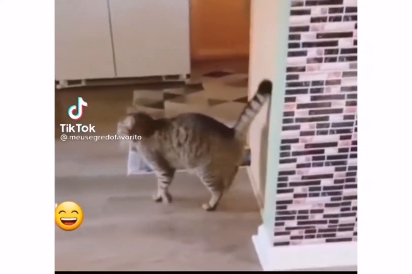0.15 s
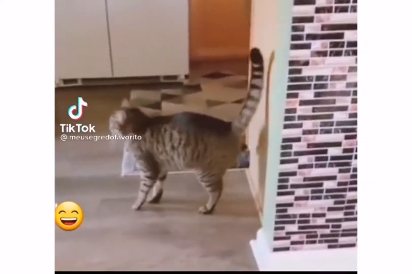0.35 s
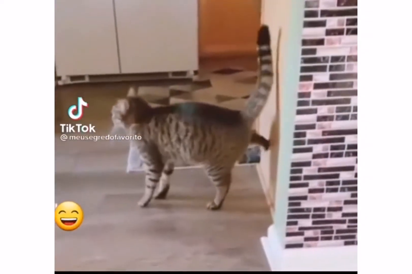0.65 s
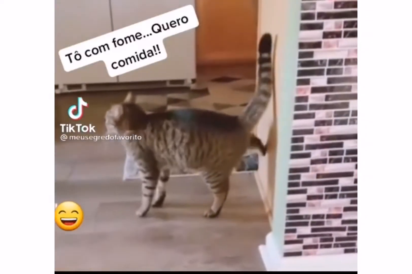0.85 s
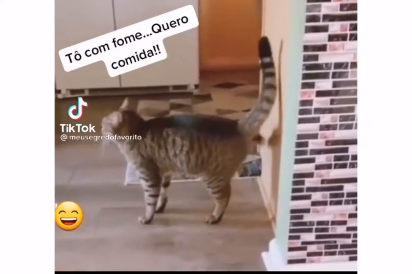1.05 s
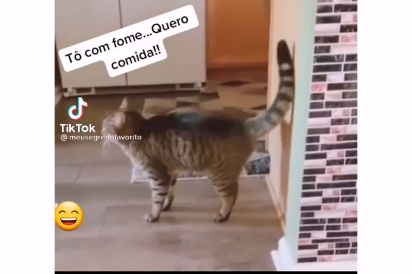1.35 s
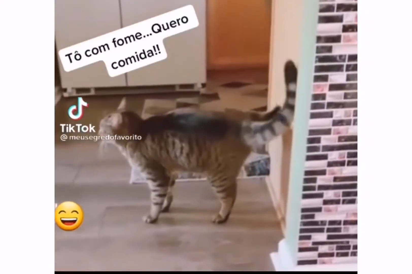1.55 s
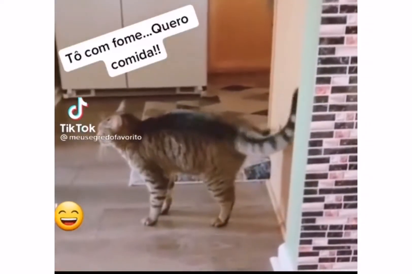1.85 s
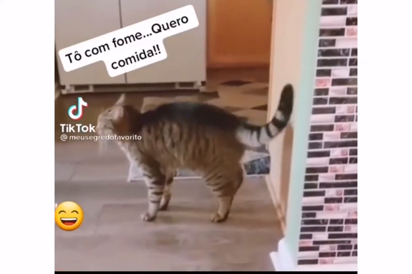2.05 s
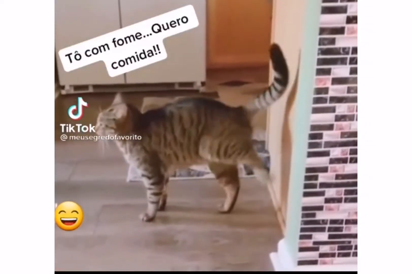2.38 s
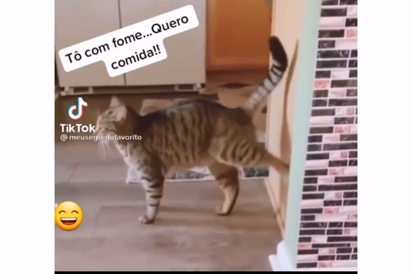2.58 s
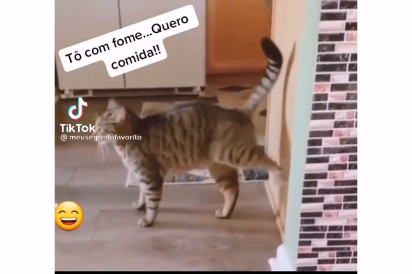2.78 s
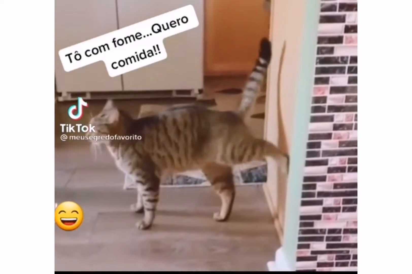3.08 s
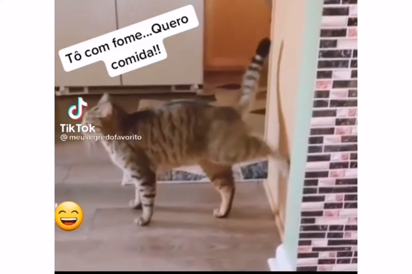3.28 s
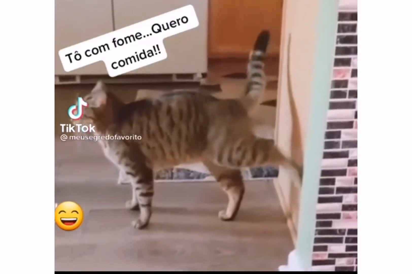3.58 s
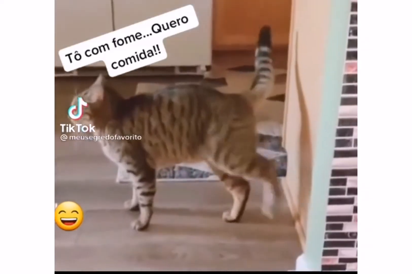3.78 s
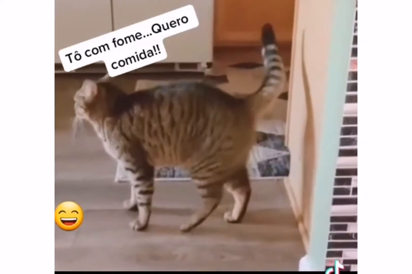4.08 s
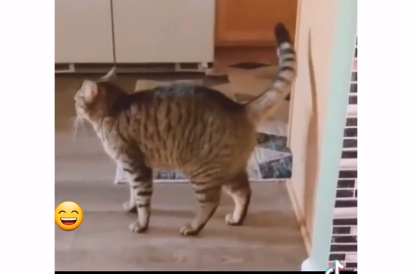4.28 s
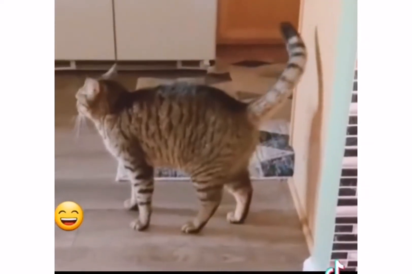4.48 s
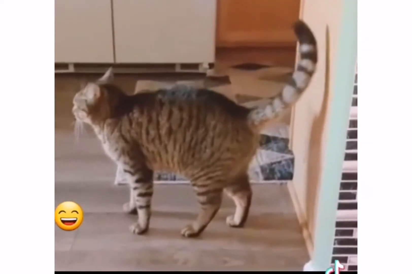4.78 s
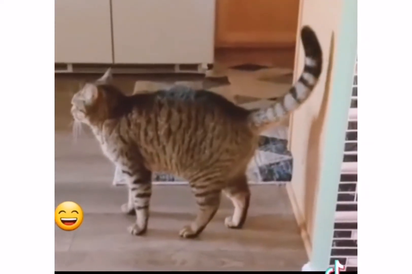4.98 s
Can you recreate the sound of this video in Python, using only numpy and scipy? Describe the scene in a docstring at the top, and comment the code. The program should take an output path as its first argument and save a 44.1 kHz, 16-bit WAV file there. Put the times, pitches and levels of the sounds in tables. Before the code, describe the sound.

Fast, hollow thumping builds as a cat drums its back paw against a wooden panel, claws ticking and skidding on each hit. It breaks off for about half a second, with a faint brush of fur, then a second run rises and fades. Soft steps and light paw taps come last. Underneath are a quiet kitchen appliance hum, a thin whine, low room rumble and slight microphone hiss.

```python
"""A kitchen: a cat drums a hind paw on a hollow wooden panel, in two fast bouts that swell and fade.
In each kick the claws tick and skid, the toes knock, then the pad lands and the panel's modes boom;
the wall sways and the room answers. Fur brushes the wall in the pause. Light taps and soft footfalls
follow. An appliance hums throughout, with a thin whine, room rumble and faint hiss."""
import sys
import numpy as np
from scipy import signal
from scipy.fft import rfft, irfft, next_fast_len
from scipy.io import wavfile

SR = 44100
rng = np.random.default_rng(int(sys.argv[2]) if len(sys.argv) > 2 else 0)


def unload_wav(signal):
    """Save mono or channel-first audio to the path in sys.argv[1] as 16-bit WAV at rate SR, clipped to [-1, 1]."""
    wavfile.write(
        sys.argv[1],
        SR,
        np.round(np.clip(np.atleast_2d(signal).T, -1, 1) * 32767).astype(np.int16),
    )


N = 226669
TIME_S = np.arange(N) / SR

# Spectra of room rumble and microphone hiss. Each row: frequency in Hz, relative level in dB.
RUMBLE_SPECTRUM = [(20, -3), (35, 6), (52, -6), (68, 13.5), (88, -11), (120, 0), (150, -7.5), (377, -8),
                   (574, -14.5), (1030, -19.5), (3160, -30.5), (11800, -41), (16000, -65)]
HISS_SPECTRUM = [(1500, 3.5), (3000, -2), (5500, -4), (8000, -2.5), (10000, -9), (12300, 0), (12900, -14),
                 (13500, -18), (15000, -63)]
# Appliance hum lines. Each row: frequency in Hz, rms level in dB.
HUM_LINES = [(59.2, -61), (118.4, -56), (1523, -73.5), (5566, -79.5)]
# Hiss and whine envelopes. Each row: time in seconds, rms level in dB.
HISS_LEVEL = [(0, -54), (.3, -58.5), (.6, -59.5), (2.2, -62.5), (5.1, -62)]
WHINE_HZ, WHINE_LEVEL = 459.5, [(0, -65), (2.2, -57), (4.2, -57.5)]

# Kicks. Each row: pad landing in seconds, force in dB.
KICKS = [(0.372, -38.5), (0.4523, -25.5), (0.5357, -20), (0.6203, -19), (0.7068, -16.5), (0.7979, -15.5),
         (0.8782, -16.5), (0.9688, -14), (1.0629, -12), (1.1568, -11.5), (1.2609, -8.5), (1.3687, -8),
         (1.47, -8), (1.5839, -8), (1.7121, -11), (1.8428, -12), (2.4266, -37), (2.488, -27),
         (2.558, -21.5), (2.6285, -16.5), (2.7104, -14), (2.789, -12.5), (2.8717, -11), (2.9555, -10.5),
         (3.0423, -10), (3.1286, -11), (3.2192, -10), (3.316, -13), (3.4109, -13.5), (3.5085, -12),
         (3.6202, -14), (3.815, -25)]
USUAL_FORCE_DB = -12
SPOT_SHIFTS_S = [1.2, 2.2]   # paw moves from panel spot 0 to 1, then to 2
# Spectra of claw tick, claw scratch and toe knock. Each row: frequency in Hz, relative level in dB.
TICK_SPECTRUM = [(3000, 2), (4500, 1.5), (6000, 3), (7800, 3), (9400, -6), (11500, 2), (13000, -8.5),
                 (15500, -26)]
SCRATCH_SPECTRUM = [(900, 4.5), (1500, 6), (1900, 2.5), (2300, 1.5), (2850, -0.5), (3600, -1), (4600, -11),
                    (7000, -25)]
KNOCK_SPECTRUM = [(200, -17.5), (320, 8.5), (500, 0), (720, 1.5), (1050, -4), (1500, -10.5), (2000, -14.5),
                  (3500, -63)]
# How sharply the claw tips catch. Each row: time in seconds, extra tick in dB.
CLAW_CATCH = [(.53, 9.5), (.65, 3.5), (.8, 3.5), (1.1, 0.5), (1.6, -5), (1.84, 1), (2.68, -0.5),
              (2.82, 6.5), (2.96, -3), (3.12, 1.5), (3.7, -1.5)]
# How far the claws are out. Each row: time in seconds, extra scratch in dB.
CLAW_REACH = [(.45, -1), (.65, -4.5), (.88, 1.5), (0.969, 5), (1.16, 6), (1.26, 0), (1.84, -0.5),
              (2.63, -2.5), (2.8, 3.5), (2.962, 0), (3.55, -3), (3.818, 8.5)]
# Scratch resonance, sinking late in each bout. Each row: time in seconds, frequency in Hz.
SCRATCH_PITCH = [(.5, 3380), (1.0, 2440), (1.302, 2800), (1.71, 2810), (1.84, 2010), (2.8, 2840),
                 (3.05, 2620), (3.22, 1470), (3.62, 1490)]
# How stiffly the toes land. Each row: time in seconds, extra knock in dB.
TOE_STIFFNESS = [(0.448, 3), (0.798, 2), (1.15, -3.5), (1.84, -6), (2.478, 1), (2.6, 4), (2.87, 3),
                 (3.0, -4), (3.449, -1), (3.62, -6.5), (3.822, 1.5)]
# Panel modes. Each row: frequency in Hz, T60 in seconds, relative level in dB at spots 0, 1 and 2.
PANEL_MODES = [(36, 0.11, -6, -19, -30), (59.6, 0.48, -17, -21.5, -14.5), (83.5, 0.15, -5.5, -4, -12),
               (114.7, 0.26, -3.5, -4, -3), (127.4, 0.14, 7.5, 7, -16), (129.8, 0.12, 10.5, 11, 2),
               (168.3, 0.27, -9, -12.5, -7), (197.36, 0.11, -38, -26, 11), (201, 0.105, 1.6, -41, 12),
               (229.4, 0.202, 5, 7.5, 1.4), (230.2, 0.1447, 8.5, 11.5, 4), (278.2, 0.18, -12, -24, -13.5),
               (334.4, 0.43, -22.5, -37, -22.5), (429.4, 0.2, -20, -20, -46),
               (448, 0.045, -11.5, -13, -6.5), (545.7, 0.18, -25, -13, -26), (590, 0.056, -21, -13, -13)]
# Early reflections of the boom. Each row: delay in seconds, linear gain.
REFLECTIONS = [(.00565, 0.14), (0.0173, 0.15), (0.023, 0.38), (.0331, .42), (0.049, 0.076)]
# Room decay. Each row: frequency in Hz, T60 in seconds.
ROOM_T60 = [(60, 1), (160, 0.69), (420, 0.79), (1100, 0.28), (2900, 0.2), (7700, 0.099), (14000, 0.024)]

# Paw taps. Each row: start in seconds, relative click in dB, length in seconds, relative ring in dB.
TAPS = [(4.033, -51, 0.0093, -59.5), (4.049, -50.5, 0.0052, -53), (4.281, -55.5, 0.0027, -60),
        (4.366, -50.5, 0.049, -50.5), (4.459, -37.5, 0.011, -45), (4.482, -63, 0.0041, -46)]
# Tap click spectrum. Each row: frequency in Hz, relative level in dB.
TAP_SPECTRUM = [(200, -35), (700, 12.5), (1200, -0.5), (2200, -1), (3900, 0.5), (5000, -15), (12000, -20),
                (15500, -24)]
# Modes rung by a tap. Each row: frequency in Hz, relative level in dB, T60 in seconds.
TAP_MODES = [(279, -3, .11), (443, -28, .08), (664, -4, 0.077), (793, -8.5, 0.11), (1425, -14, 0.094),
             (1564, -2, 0.11), (2030, -9, 0.09), (2150, -8, 0.067)]
# Weight settling on the floor. Each row: time in seconds, force in dB.
FOOTFALLS = [(4.087, -45), (4.142, -34), (4.335, -45), (4.375, -34.5)]


def from_db(db):
    """Decibels to gain."""
    return 10 ** (np.asarray(db) / 20)


def unit_rms(x):
    """Scale to rms 1."""
    return x / np.sqrt(np.mean(x ** 2) + 1e-20)


def at_time(table, time_s):
    """Read a table on a time axis."""
    return np.interp(time_s, *np.transpose(table))


def at_hz(table, hz):
    """Read a table on a log-frequency axis."""
    table = np.array(table)
    return np.interp(np.log(np.maximum(hz, 1)), np.log(table[:, 0]), table[:, 1])


def decay(time_s, t60_s):
    """Envelope falling 60 dB in t60_s."""
    return np.exp(-np.log(1000) * time_s / t60_s)


def add(out, start_s, sound):
    """Mix a sound in at start_s."""
    start = round(start_s * SR)
    out[start:start + len(sound)] += sound[:N - start]


def colour(x, spectrum):
    """Minimum-phase filter with the given spectrum."""
    size = 2 * next_fast_len(len(x))
    gains = from_db(at_hz(spectrum, np.fft.rfftfreq(size, 1 / SR)))
    cepstrum = irfft(np.log(gains))
    cepstrum[1:size // 2] *= 2
    cepstrum[size // 2 + 1:] = 0
    return irfft(rfft(x, size) * np.exp(rfft(cepstrum)))[:len(x)]


def noise(spectrum):
    """Steady coloured noise, rms 1."""
    return unit_rms(colour(rng.standard_normal(N), spectrum))


def mode(force, hz, t60_s):
    """Damped resonator: a unit impulse rings a sine of height 1."""
    radius, angle = decay(1 / SR, t60_s), 2 * np.pi * hz / SR
    return signal.lfilter([0, np.sin(angle)], [1, -2 * radius * np.cos(angle), radius ** 2], force + 1e-18)


def pushes(times_s, gains, contact_s):
    """Bell-shaped force pulses, each with the area of its gain."""
    impulses = np.zeros(N)
    impulses[np.round(np.asarray(times_s) * SR).astype(int)] = gains
    bell = signal.windows.hann(int(contact_s * SR) + 3)
    return signal.fftconvolve(impulses, bell / bell.sum(), "same")


def kicks():
    """Times in seconds, forces in dB and panel spots of all kicks."""
    times_s, force_db = np.transpose(KICKS)
    return times_s, force_db, np.searchsorted(SPOT_SHIFTS_S, times_s)


def background(rumble_db, waver_db):
    """Room rumble, microphone hiss and a slightly wavering appliance hum; a thin whine swells in."""
    rumble = from_db(rumble_db) * noise(RUMBLE_SPECTRUM)
    hiss = from_db(at_time(HISS_LEVEL, TIME_S)) * noise(HISS_SPECTRUM)
    knots_s, hum = np.linspace(0, TIME_S[-1], 30), 0
    for hz, db in [*HUM_LINES, (WHINE_HZ, at_time(WHINE_LEVEL, TIME_S))]:
        drift_db = waver_db * np.interp(TIME_S, knots_s, rng.standard_normal(len(knots_s)))
        tone = np.sin(2 * np.pi * (hz * TIME_S + rng.random()))
        hum = hum + np.sqrt(2) * from_db(db + drift_db) * tone
    return rumble + hiss + hum


def scrape(spectrum, length_s, rise_s, wash_db, t60_s, grain_db=8.0):
    """A short run of uneven micro-slips and its noisy wash; rms 1 over the first 20 ms."""
    time_s = TIME_S[:12288]
    grains = unit_rms(from_db(grain_db * rng.standard_normal(len(time_s))))
    slips = grains * np.exp(-(time_s / length_s) ** 2)
    wash = from_db(wash_db) * decay(time_s, t60_s)
    attack = 1 - np.exp(-time_s / rise_s)
    burst = colour(rng.standard_normal(len(time_s)) * (slips + wash) * attack, spectrum)
    return burst / np.std(burst[:SR // 50])


def voiced(spectrum, peak_hz, peak_db, width_oct, uneven_db=2.0):
    """Spectrum of one contact: it favours one resonance and weights the others by chance."""
    hz = np.geomspace(100, 17000, 70)
    boost_db = peak_db / (1 + (np.log2(hz / peak_hz) / width_oct) ** 2)
    chance_db = uneven_db * rng.standard_normal(len(hz))
    return np.column_stack([hz, at_hz(spectrum, hz) + boost_db + chance_db])


def claws_and_toes(claw_lead_s, toe_lead_s, hard_hz, gentle_hz, scatter_oct):
    """Claw tips tick and skid, then toes knock on the wood; harder kicks are brighter."""
    out = np.zeros(N)
    for kick_s, force_db in KICKS:
        sag_oct = 0.6 * max(-15.5 - force_db, 0)   # gentle kicks knock lower
        knock_hz = max(hard_hz / 2 ** sag_oct, gentle_hz) * 2 ** (scatter_oct * rng.standard_normal())
        tick = scrape(TICK_SPECTRUM, length_s=0.005, rise_s=0.00042, wash_db=-10, t60_s=0.27)
        claw_spectrum = voiced(SCRATCH_SPECTRUM, at_time(SCRATCH_PITCH, kick_s), 7.5, width_oct=0.11)
        scratch = scrape(claw_spectrum, length_s=0.0058, rise_s=0.0028, wash_db=-11.5, t60_s=0.27)
        toe_spectrum = voiced(KNOCK_SPECTRUM, knock_hz, peak_db=6, width_oct=0.23)
        knock = scrape(toe_spectrum, length_s=0.0087, rise_s=0.00045, wash_db=6.5, t60_s=0.29)
        effort_db = force_db - USUAL_FORCE_DB
        tick_db = -42 + 1.44 * effort_db + at_time(CLAW_CATCH, kick_s)
        scratch_db = -32.5 + 1.81 * effort_db + at_time(CLAW_REACH, kick_s)
        knock_db = -26.5 + 1.38 * effort_db + at_time(TOE_STIFFNESS, kick_s)
        add(out, kick_s - claw_lead_s, from_db(tick_db) * tick + from_db(scratch_db) * scratch)
        add(out, kick_s - toe_lead_s, from_db(knock_db) * knock)
    return out


def room_reverb(send, build_s):
    """Diffuse room tail: noise that dies band by band, near unit gain."""
    time_s, tail = TIME_S[:SR // 2], 0
    attack = 1 - np.exp(-time_s / build_s)
    edges_hz = np.geomspace(25, 17000, 20)
    for low_hz, high_hz in zip(edges_hz, edges_hz[1:]):
        bandpass = signal.butter(2, [low_hz, high_hz], "band", fs=SR, output="sos")
        band = signal.sosfilt(bandpass, rng.standard_normal(SR))[-len(time_s):]
        band *= attack * decay(time_s, at_hz(ROOM_T60, np.sqrt(low_hz * high_hz)))
        tail = tail + band * np.sqrt(2 * (high_hz - low_hz) / SR / np.sum(band ** 2))
    return signal.fftconvolve(send, tail)[:N]


def panel_boom(contact_s, gain_db, uneven_db):
    """The pad drives the panel's modes, weighted by spot and chance; early reflections follow."""
    times_s, force_db, spots = kicks()
    chance_db = uneven_db * rng.standard_normal((len(times_s), len(PANEL_MODES)))
    boom = np.zeros(N)
    for k, (hz, t60_s, *spot_db) in enumerate(PANEL_MODES):
        gains = from_db(force_db + np.array(spot_db)[spots] + gain_db + chance_db[:, k])
        polarity = -(-1) ** k   # neighbouring modes swing opposite ways
        boom += polarity * mode(pushes(times_s, gains, contact_s), hz, t60_s)
    echoes = (gain * np.interp(TIME_S - delay_s, TIME_S, boom, left=0) for delay_s, gain in REFLECTIONS)
    return boom + sum(echoes)


def wall_sway(hz, t60_s, lag_s, gain_db):
    """The wall behind the panel takes up each kick late and slowly."""
    times_s, force_db, _ = kicks()
    return mode(pushes(times_s + lag_s, from_db(force_db + gain_db), contact_s=0.012), hz, t60_s)


def rising_rings(start_hz, end_hz, glide_s, rise_s, t60_s, lead_s=0.00282, scatter_oct=0.018):
    """Kicks on spot 1 leave a short hollow tone that glides up as it dies."""
    out, time_s = np.zeros(N), TIME_S[:SR // 4]
    glide_hz = end_hz + (start_hz - end_hz) * np.exp(-time_s / glide_s)
    envelope = (1 - np.exp(-time_s / rise_s)) * decay(time_s, t60_s)
    for kick_s, force_db, spot in zip(*kicks()):
        if spot == 1:
            hz = glide_hz * 2 ** (scatter_oct * rng.standard_normal())
            tone = np.sin(2 * np.pi * np.cumsum(hz) / SR)
            ring_db = -14 + 0.3 * (force_db - USUAL_FORCE_DB)
            add(out, kick_s - lead_s, from_db(ring_db) * envelope * tone)
    return out


def fur_brush(peak_s, width_s, level_db):
    """Fur brushes the wall once: a brief swell of bright noise."""
    swell = np.exp(-((TIME_S - peak_s) / width_s) ** 2)
    return from_db(level_db) * swell * noise(TICK_SPECTRUM)


def paw_taps(click_gain_db, ring_gain_db):
    """Light touches: a dry click and a short hollow ring."""
    clicks = np.zeros(N)
    for start_s, click_db, length_s, _ in TAPS:
        click = scrape(TAP_SPECTRUM, length_s, rise_s=0.00048, wash_db=-8.5, t60_s=0.29)
        add(clicks, start_s, from_db(click_db + click_gain_db) * click)
    times_s, _, _, ring_db = np.transpose(TAPS)
    force = pushes(times_s, from_db(ring_db + ring_gain_db), contact_s=0.0002)
    return clicks + sum(from_db(db) * mode(force, hz, t60_s) for hz, db, t60_s in TAP_MODES)


def footfalls(floor_hz, t60_s):
    """Soft footfalls rock the floor."""
    times_s, force_db = np.transpose(FOOTFALLS)
    return mode(pushes(times_s, from_db(force_db), contact_s=0.012), floor_hz, t60_s)


def scene():
    """Low thumps and bright contacts, their reverberation and the background; mono."""
    low = panel_boom(contact_s=0.00061, gain_db=0.77, uneven_db=0.45)
    low += wall_sway(hz=33.2, t60_s=0.18, lag_s=0.02082, gain_db=-9)
    low += footfalls(floor_hz=56, t60_s=0.27)
    high = claws_and_toes(claw_lead_s=0.0056, toe_lead_s=0.003237,
                          hard_hz=1084, gentle_hz=500, scatter_oct=0.098)
    high += paw_taps(click_gain_db=-4, ring_gain_db=9.5)
    high += rising_rings(start_hz=471.5, end_hz=642, glide_s=0.0191, rise_s=0.015, t60_s=0.14)
    high += fur_brush(peak_s=2.095, width_s=0.024, level_db=-55.5)
    room = room_reverb(from_db(-12) * low + from_db(-8) * high, build_s=0.0048)
    return (low + high + room + background(rumble_db=-48, waver_db=0.5))[None]


def record(dry):
    """Microphone: 15 Hz high-pass, clip at full scale, 15.8 kHz low-pass."""
    sound = signal.lfilter(*signal.butter(1, 15, "high", fs=SR), dry)
    lowpass = signal.ellip(10, 0.2, 80, 15800, fs=SR, output="sos")
    return signal.sosfilt(lowpass, np.clip(sound, -1, 1))


dry = scene()
out = record(dry)
unload_wav(out)
```